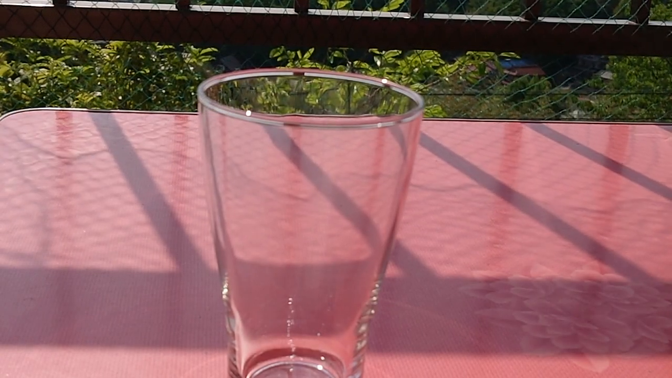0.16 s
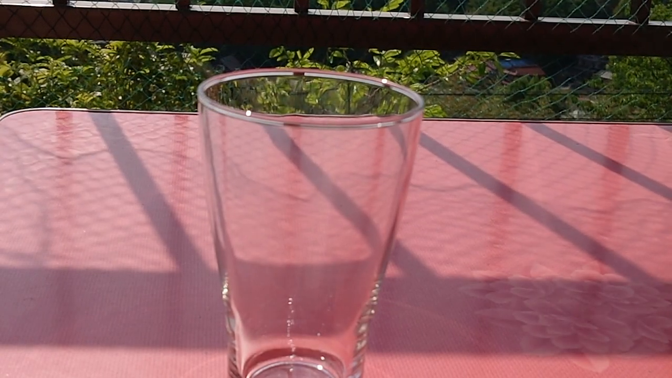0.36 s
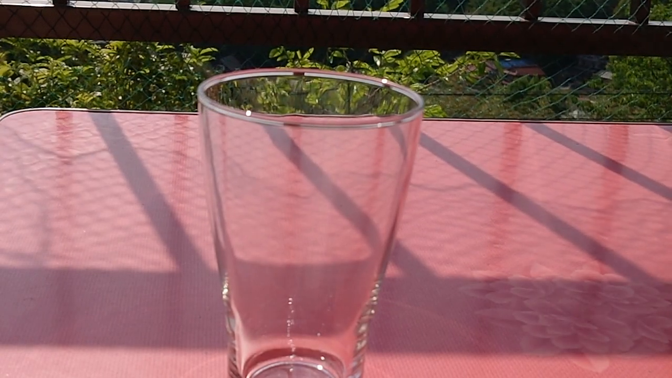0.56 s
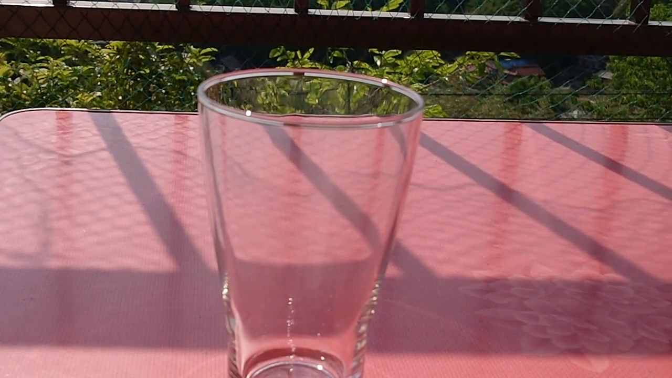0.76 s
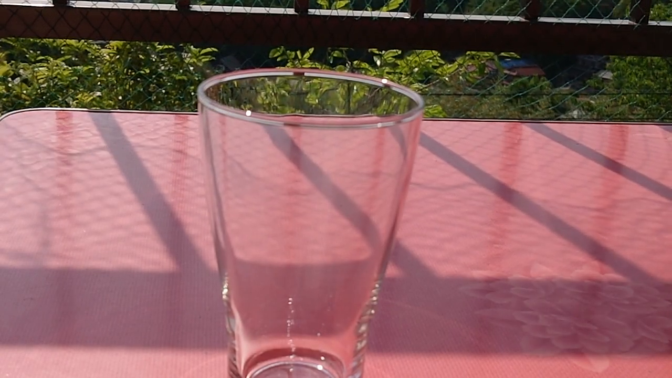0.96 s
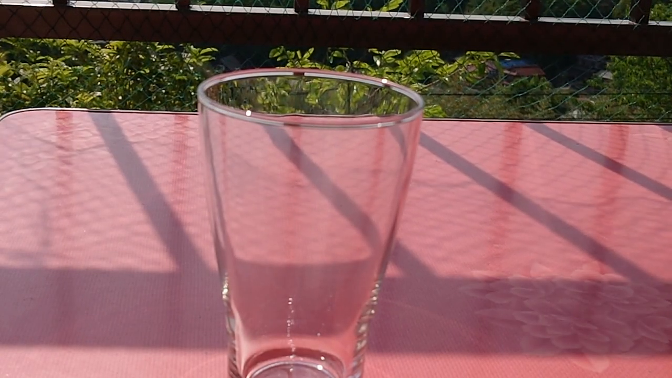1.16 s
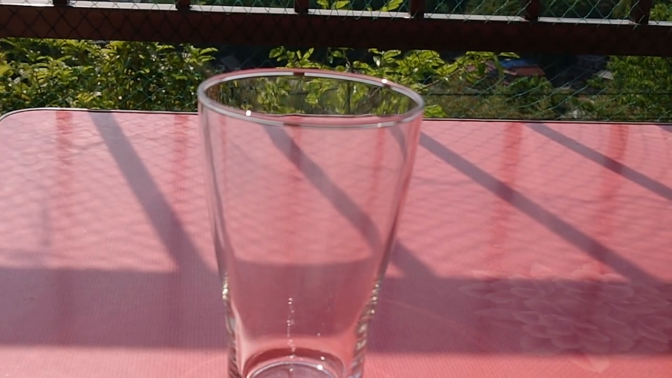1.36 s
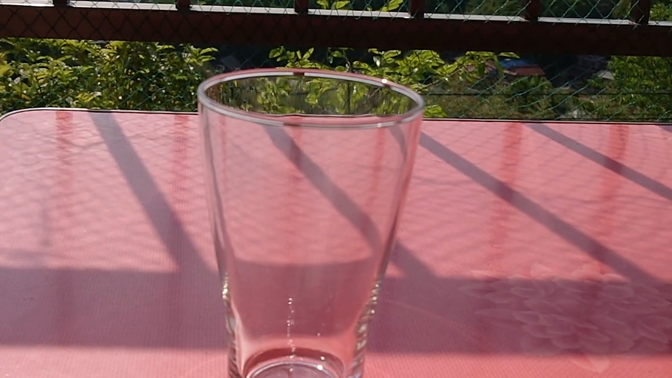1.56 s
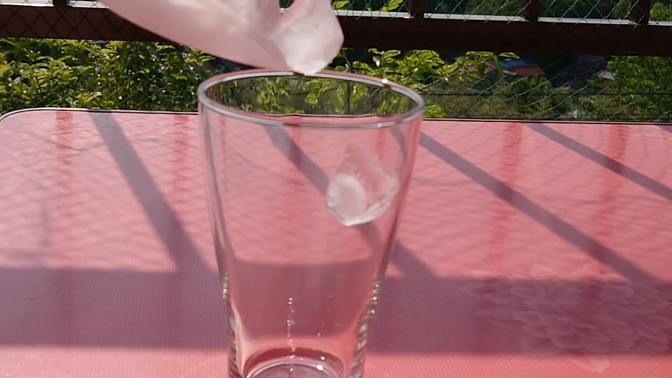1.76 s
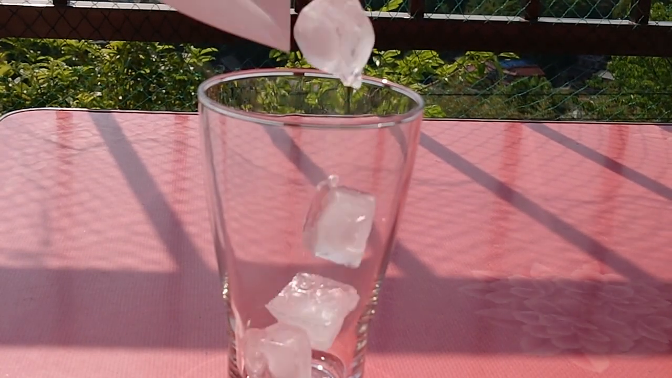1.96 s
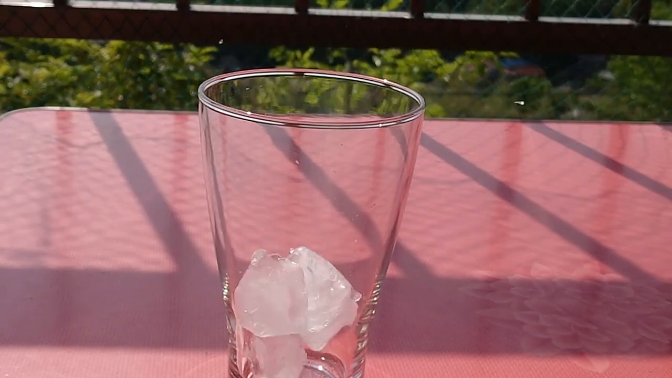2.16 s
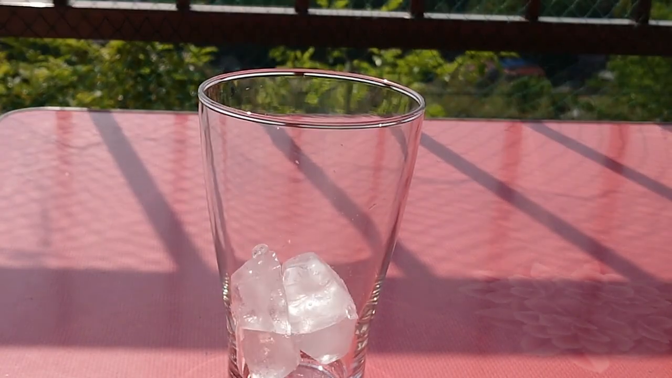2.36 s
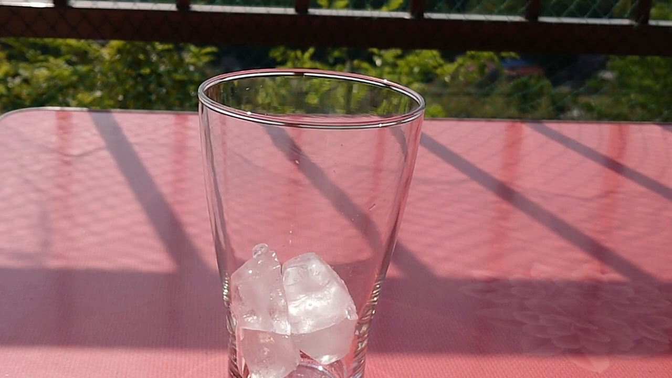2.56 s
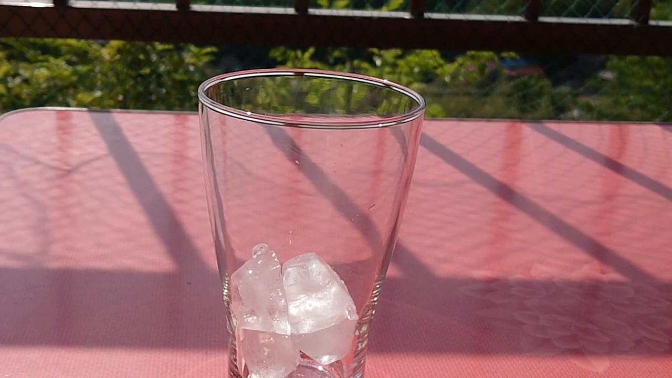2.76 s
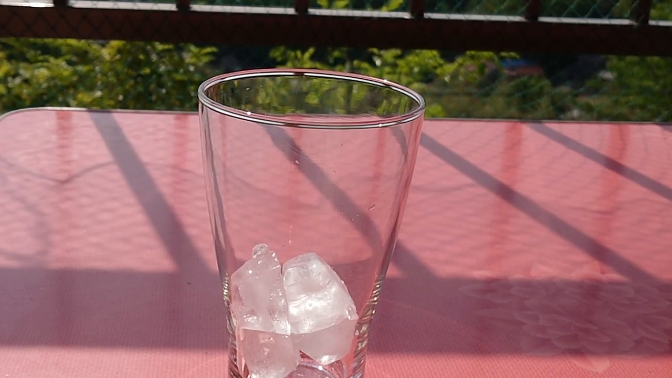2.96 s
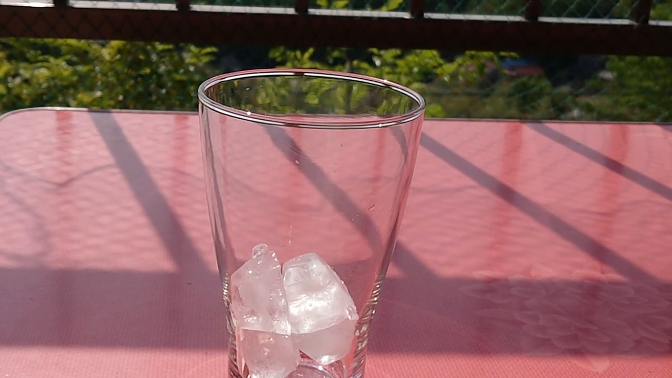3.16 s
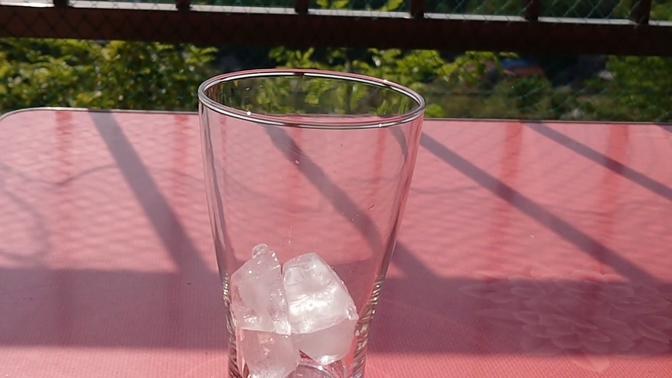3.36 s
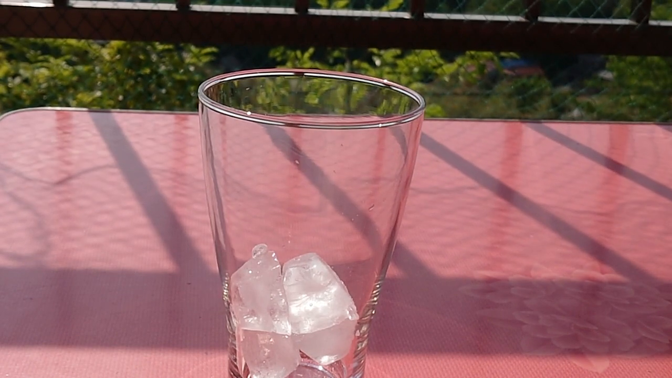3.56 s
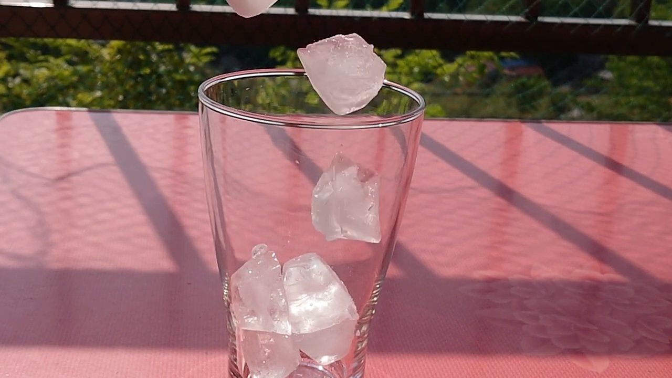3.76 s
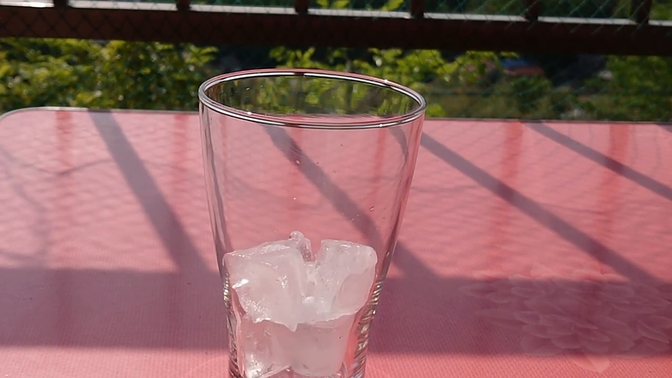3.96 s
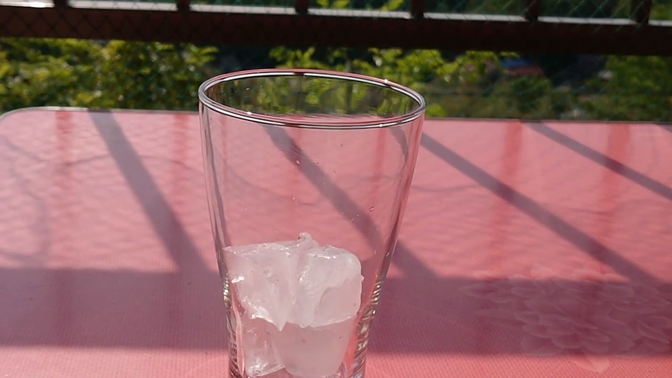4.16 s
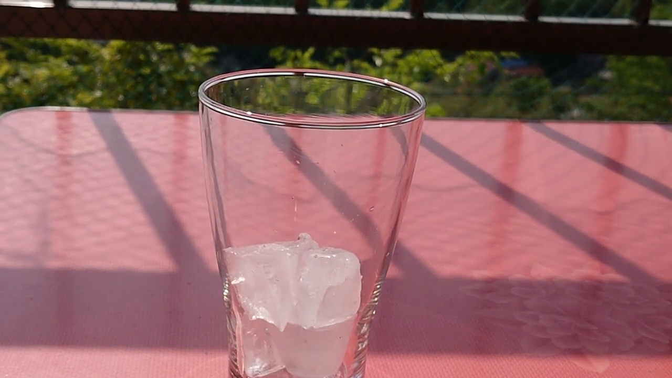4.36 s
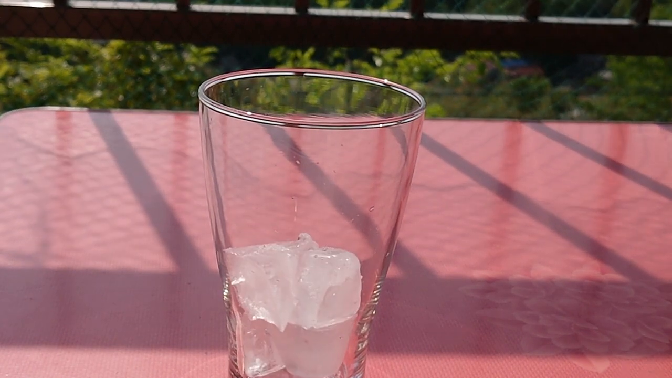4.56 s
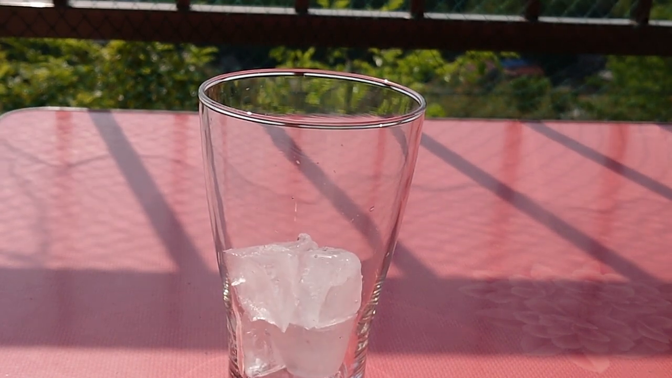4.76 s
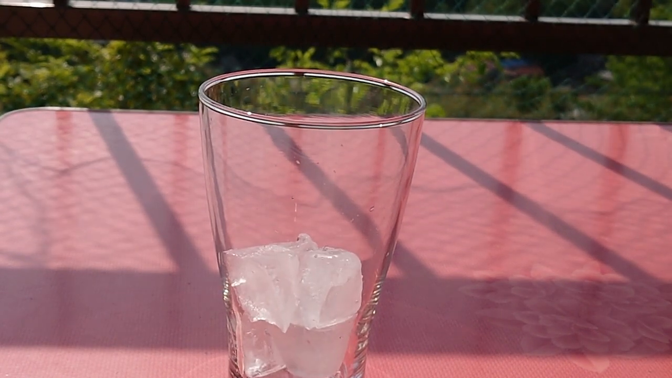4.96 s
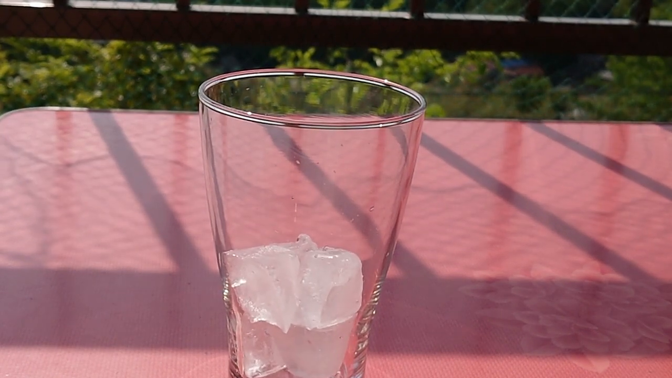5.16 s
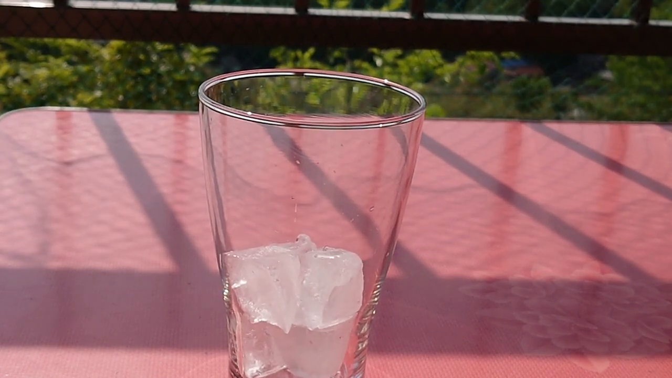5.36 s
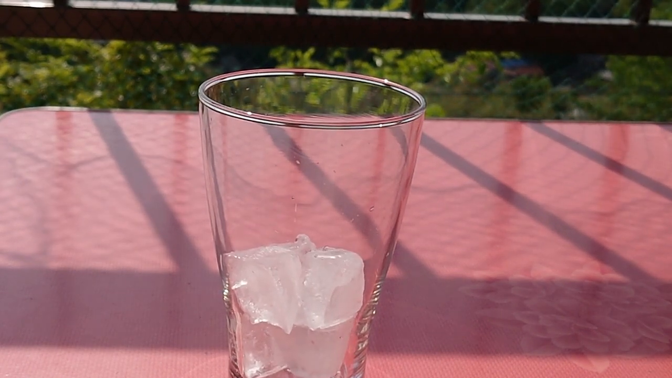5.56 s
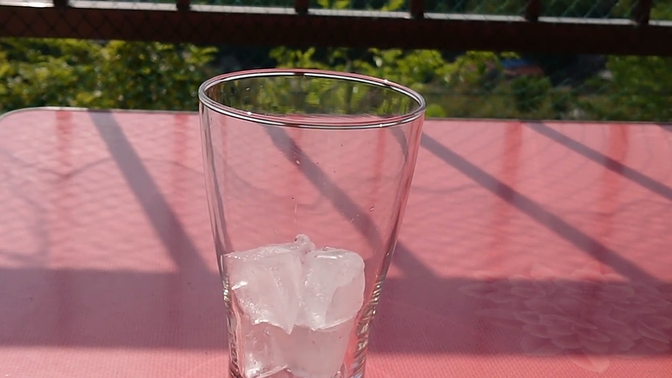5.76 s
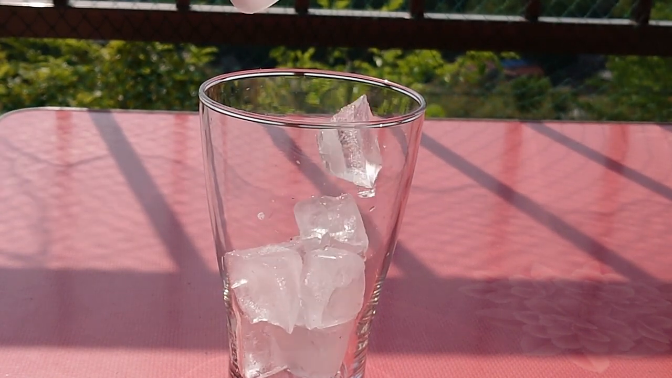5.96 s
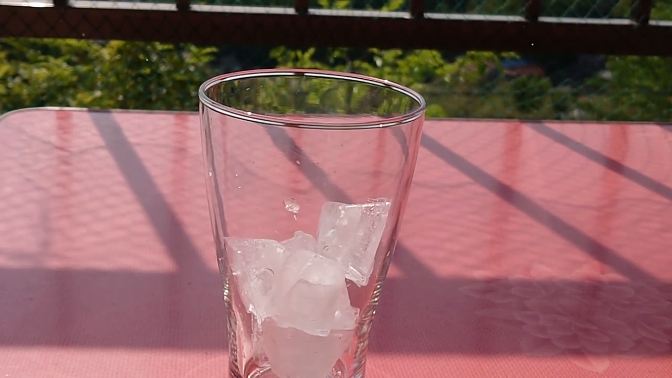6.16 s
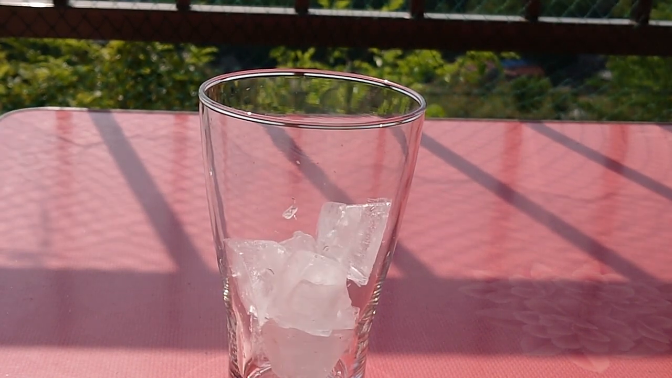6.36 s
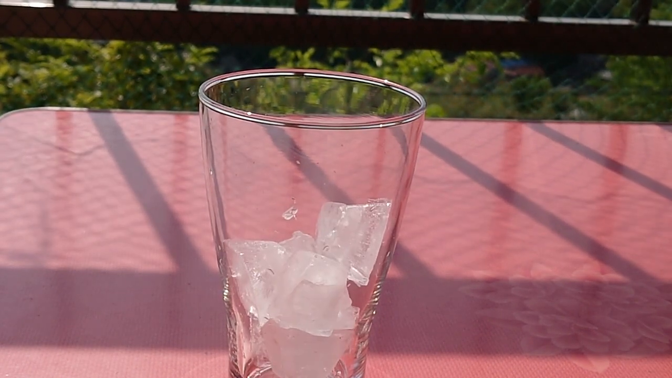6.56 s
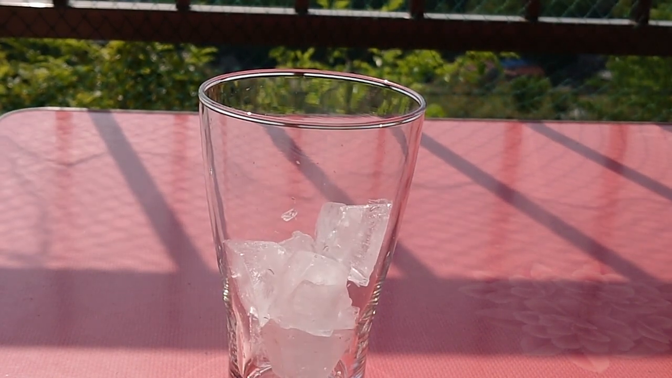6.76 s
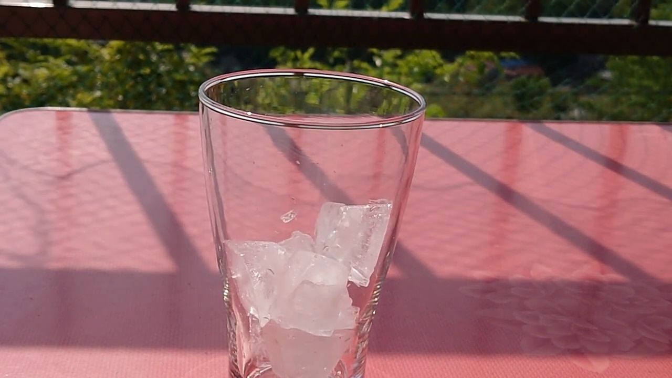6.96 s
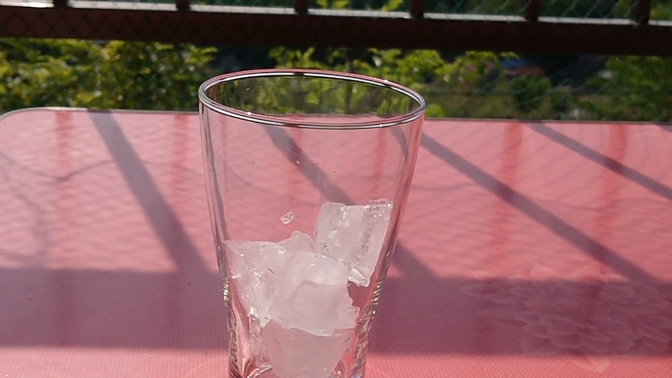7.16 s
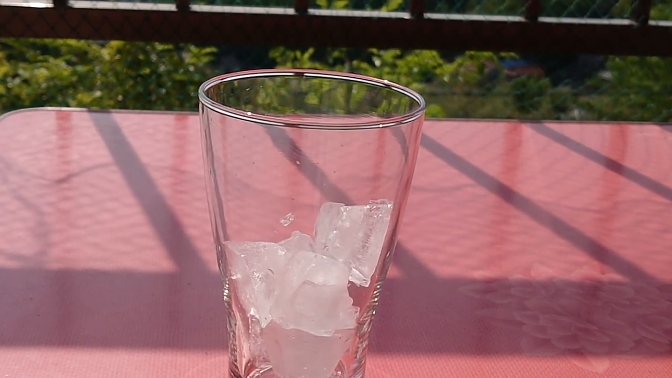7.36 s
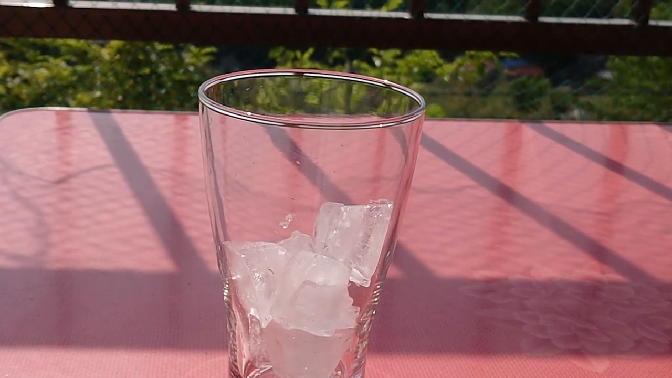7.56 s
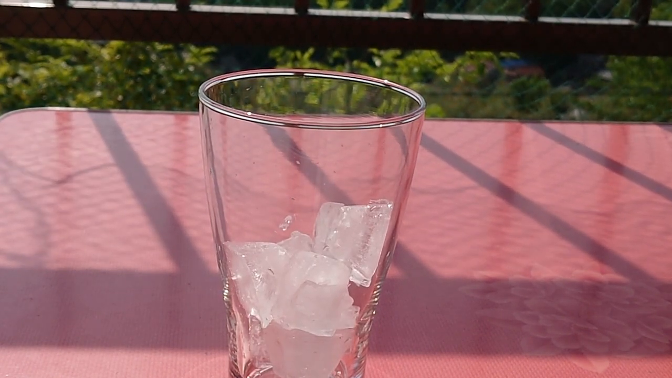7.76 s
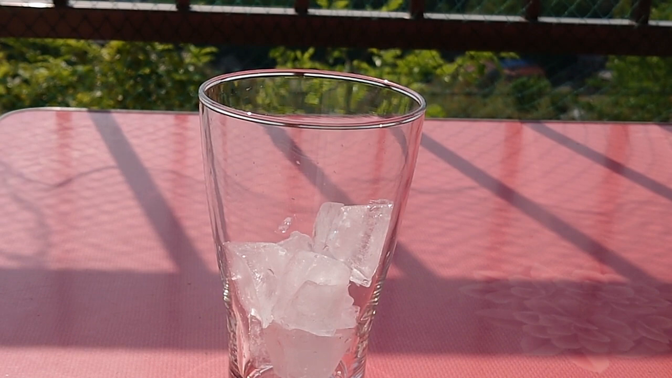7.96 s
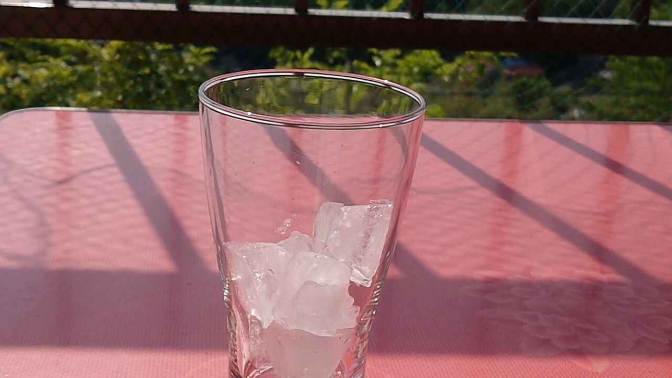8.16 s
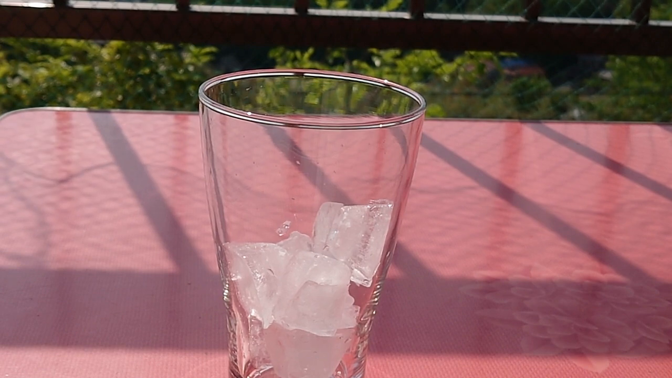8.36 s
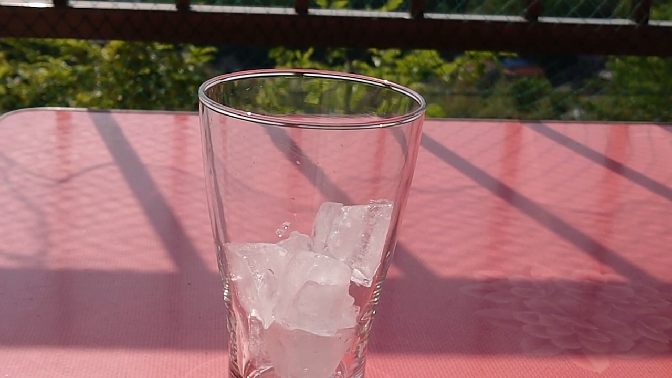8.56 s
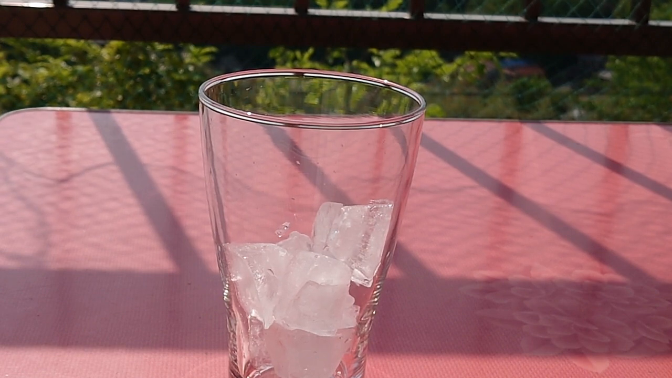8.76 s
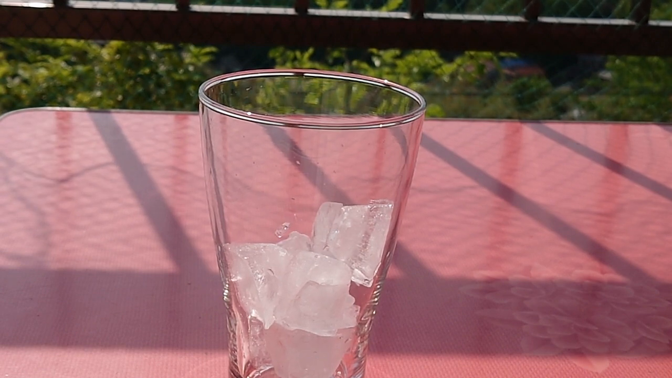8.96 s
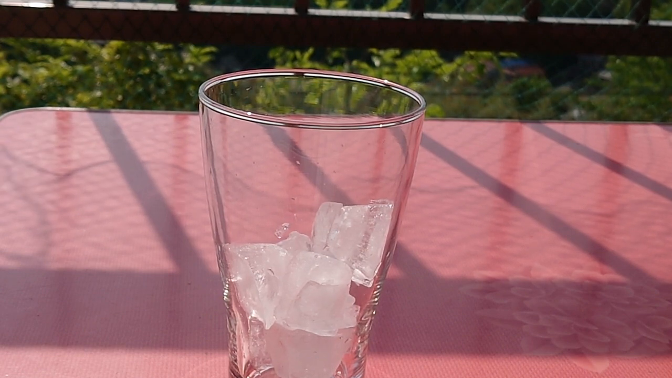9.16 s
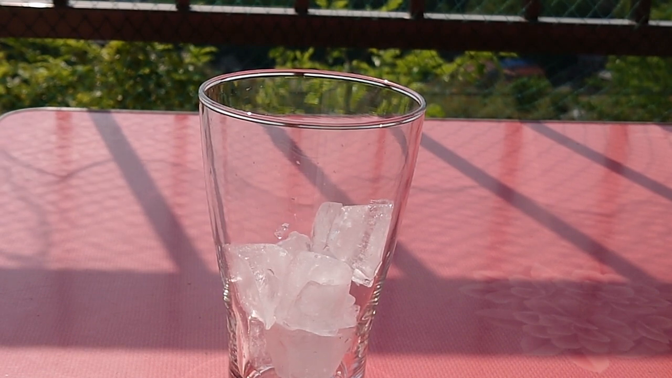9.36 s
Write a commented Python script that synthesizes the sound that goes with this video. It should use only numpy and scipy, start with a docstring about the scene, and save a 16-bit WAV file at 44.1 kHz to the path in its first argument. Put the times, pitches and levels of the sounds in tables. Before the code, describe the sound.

Ice cubes are scooped with a crunchy rattle from a hollow plastic tub and dropped, clinking, into a tall glass three times outdoors.

```python
"""Ice scooped into a glass

Ice is scooped from a plastic tub and dropped, in three goes, into a tall glass on a balcony table.
In the tub, random contacts trigger small pitched ticks of ice and drum on the resonances of the plastic.
In the glass, noise bursts clack and decaying modes ring, the low ones ever shorter as it fills.
At the end the tub thumps down and crinkles. Filtered noise makes a buffeting breeze and faint outdoor hush."""
import sys
import numpy as np
from scipy import signal
from scipy.fft import rfft, irfft
from scipy.io import wavfile
from scipy.ndimage import uniform_filter1d, map_coordinates

SR = 44100
rng = np.random.default_rng(int(sys.argv[2]) if len(sys.argv) > 2 else 0)


def transcribe(signal):
    """Save signal, clipped to [-1, 1], as a 16-bit WAV file at the path in sys.argv[1]."""
    frames = np.atleast_2d(signal).T
    limited = np.clip(frames, -1, 1)
    pcm = np.round(limited * 32767).astype(np.int16)
    wavfile.write(sys.argv[1], SR, pcm)


N = 414540
TIME_S = np.arange(N) / SR

# Distant outdoor noise. Each row: frequency in Hz, relative level in dB.
HUSH_COLOUR = [(18, -42.5), (30, -5), (75, 3), (449, -18), (866, -20.5), (2230, -32), (3870, -30.5),
               (7470, -53), (16000, -61)]
# Gusts at the microphone. Each row: peak in seconds, half length (to 1/e) in seconds, relative level in dB.
GUSTS = [(3.85, 0.24, -49), (5.513, 0.11, -46.5), (5.92, 0.036, -38.5), (6.605, 0.066, -41),
         (6.987, 0.011, -25), (7.262, 0.017, -32), (7.413, 0.074, -22.5), (7.694, 0.55, -46)]
# Pushes of the scoop through the ice. Each row: start in seconds, length in seconds,
# relative crunch level in dB, tub boom in dB above the crunch setting.
SCOOP_PUSHES = [(0, .18, -24, -3.5), (0.242, 0.36, -31.5, -8), (.632, 0.33, -34, -1), (2.694, 0.61, -39, 4),
                (2.847, 0.22, -29.5, -3.5), (3.107, 0.15, -35.5, -13.5), (3.334, 0.23, -55, -8.5),
                (4.435, 0.099, -38.5, -1), (4.599, 0.32, -29, -3), (4.949, 0.47, -32.5, -7.5),
                (5.576, 0.14, -43, 2), (5.835, 0.025, -46, -4), (6.793, 0.25, -49, 2),
                (7.062, 0.09, -46.5, 1.5), (7.2, 0.094, -41.5, -10)]
# Wet cubes sliding off the scoop, louder as they gather speed. Each row: start in seconds,
# length in seconds, relative starting level in dB.
SLIDES = [(1.667, 0.716, -60), (3.877, 0.029, -44)]
# Crack of ice. Each row: frequency in Hz, relative level in dB.
CRACK_COLOUR = [(150, -31.5), (1300, 0), (2400, -2.5), (5400, -12.5), (6600, -22), (7600, -31.5),
                (10000, -23), (13300, -38), (15600, -30)]
# Modes of the tub. Each row: multiple of the main resonance, width in Hz, relative level in dB.
TUB_MODES = [(.27, 223.7, -26), (.62, 139, -7.5), (.9, 107.5, 2.5), (1.04, 125.5, 4.5), (1.85, 220, -5.5)]
# Loudest knocks of cubes on scoop and tub. Each row: time in seconds, relative crack level in dB,
# tub boom in dB above the crack setting.
KNOCKS = [(.030, -17, 1), (.053, -19.5, 3), (.089, -25.5, 14.5), (.122, -22, 8.5), (.136, -15, -5.5),
          (.160, -21, 9.5), (.289, -23, 6.5), (.316, -20.5, 3), (.392, -17, -3.5), (.651, -31.5, 8),
          (.666, -33, 13.5), (.6871, -25.5, 11.5), (.699, -27, 8.5), (.783, -22.5, 14), (.813, -25.5, 14),
          (1.0236, -25, 6.5), (1.1221, -37.5, -6.5), (2.6996, -26.5, 6.5), (2.7465, -22, 5),
          (2.766, -24, 9.5), (2.896, -26, 9), (2.917, -13.5, 8), (2.944, -17, 5), (3.010, -34, 17),
          (3.027, -19.5, 7), (3.051, -24, 8), (4.4398, -20, -7.5), (4.4505, -16.5, -4.5),
          (4.4891, -22.5, 4), (4.6152, -17, -11), (4.6283, -9.5, 3.5), (4.674, -23, 2), (4.757, -18, 6),
          (4.779, -23.5, 8), (4.846, -25, 1), (4.916, -20, -1.5), (5.004, -15.5, -9), (5.163, -25.5, 0),
          (5.212, -26, 6), (5.262, -24.5, 2), (5.317, -25.5, 8.5), (5.592, -21.5, 7), (5.6151, -17.5, 2.5),
          (5.656, -30.5, 5), (5.7597, -20, -4), (6.766, -27.5, 7.5), (6.876, -40.5, 16),
          (6.9378, -20.5, -2.5), (7.074, -38, 1), (7.144, -32.5, 7), (7.283, -32.5, 7)]
# Place of the tub: off to the right, held by the glass, then moved away.
# Each row: time in seconds, delay of the left port in seconds.
TUB_PLACE = [(1.2, 0.00017), (1.7, 0.000016), (6.2, 0.000017), (6.75, 0.00024)]
# One cube grating along its neighbours. Each row: start in seconds, length in seconds,
# relative level in dB, pitch of the cube in Hz.
SCRAPES = [(0.385, 0.032, -29, 4490), (0.538, 0.063, -37, 2500), (0.818, 0.038, -38.5, 3750),
           (2.711, 0.017, -34, 4230), (2.825, 0.017, -29.5, 2320), (3.113, 0.016, -31.5, 2930),
           (3.143, 0.01, -30, 2600), (3.162, .018, -29.5, 2500), (3.441, 0.013, -42.5, 2820),
           (3.703, 0.012, -46.5, 2380), (4.737, .035, -29, 2380), (4.965, 0.017, -27, 1960),
           (5.007, 0.015, -29.5, 2360), (5.126, 0.012, -30.5, 2610), (6.939, 0.021, -30.5, 3440),
           (6.988, 0.02, -36.5, 1710)]
# A loose cube ticking on its neighbour, clear of the tub. Each row: time in seconds,
# relative level in dB, pitch in Hz.
LOOSE_TICKS = [(1.8156, -26, 3150), (3.4186, -27.5, 2120), (3.601, -33, 2310), (5.9685, -38, 1670),
               (6.007, -36, 2270), (6.112, -25, 1890), (6.5147, -49, 2820), (6.57, -44.5, 3190),
               (6.7063, -36, 3680), (6.856, -31, 4170)]
# Cubes striking in the glass. Each row: time in seconds, then relative levels in dB of
# the wall ring, the clack and the thud on the base.
CLINKS = [(1.963, -38.5, -29.5, -62.5), (2.035, -42, -30, -14.5), (2.063, -41.5, -17, -81.5),
          (2.085, -23, -19, -36.5), (2.138, -36, -18.5, -17.5), (2.150, -24, -21.5, -25.5),
          (2.198, -39.5, -25, -24.5), (2.222, -35.5, -17.5, -30), (2.243, -27, -13.5, -30),
          (2.303, -33, -20, -21), (2.383, -41.5, -32.5, -27), (3.987, -38.5, -27.5, -42),
          (3.997, -27.5, -12, -18), (4.006, -21.5, -31, -25.5), (4.022, -21, -18, -35),
          (4.056, -25.5, -19.5, -32.5), (4.104, -41.5, -25.5, -24), (6.16, -45, -30, -45),
          (6.183, -34, -17, -25), (6.207, -40, -17, -24)]
# Clack of a cube on glass. Each row: frequency in Hz, relative level in dB.
CLACK_COLOUR = [(150, -3), (800, 13), (5200, 10), (6100, 3.5), (7700, -31), (9200, -38.5), (10600, -25),
                (14000, -39.5), (15600, -22)]
# Foot of the glass on the table. Each row: frequency in Hz, width in Hz, relative level in dB.
BASE_MODES = [(283, 110, -2), (579, 59, -8.5), (788, 51, -0.5), (1210, 900, 4.5)]
# Main modes of the glass wall. Each row: frequency in Hz, decay time (T60) without ice in seconds.
MAIN_MODES = [(1502, 0.26), (2449, 0.6), (4309, 0.33)]
# Answer of each main mode to a blow. Each row: dB at a medium blow, extra dB per dB of force,
# extra dB per scoop of ice. Hard blows and a fuller glass favour the highest mode.
WALL_ANSWER = [(-0.5, .05, 1.2), (1, -0.12, 0.16), (-1.5, 0.52, 2.2)]
# Dips and swells of the highest main mode. Each row: middle in seconds, half length (to 1/e)
# in seconds, peak change in dB.
RING_DIPS = [(2.193, 0.046, -12), (4.12, 0.029, -16), (4.19, .07, 4), (6.255, 0.014, -14), (6.305, .07, 6)]
# Weaker modes of the glass, which follow the clack. Each row: frequency in Hz, relative level in dB.
SHIMMER_MODES = [(694, -27), (5920, -18), (5870, -17), (5992, -17), (6760, -25), (6992, -26), (8436, -30),
                 (9722, -31), (10815, -34), (11480, -36), (13221, -41), (15320, -37)]
# The tub bumps on the table and at last is set down, rocking on its rim.
# Each row: time in seconds, relative level in dB.
THUMPS = [(2.918, -20.5), (4.63, -35), (8.358, -15), (8.367, -19), (8.388, -18.5), (8.42, -28.5)]
# Thump of the tub. Each row: frequency in Hz, relative level in dB.
THUMP_COLOUR = [(40, -3.5), (300, 0.5), (450, -8), (1400, -16), (3000, -32), (8000, -60)]
# Plastic crinkling as the hand lets go. Each row: time in seconds, relative level of the snap in dB.
CRINKLES = [(8.357, -43), (8.408, -34), (8.616, -49), (8.774, -36), (8.876, -34.5), (8.8985, -32.5),
            (8.94, -36), (9.068, -43), (9.127, -44.5)]
# Snap of thin plastic. Each row: frequency in Hz, relative level in dB.
PLASTIC_COLOUR = [(150, 1), (1600, 3), (5400, -7.5), (7400, -36), (9500, -21), (15000, -38)]
# Echoes of the balcony. Each row: frequency in Hz, decay time (T60) in seconds.
BALCONY_DECAY = [(200, 0.5), (900, 0.22), (5000, 0.16)]

HUSH_DB, CALM_BREEZE_DB = -53.5, -72.5
# A hand movement bites, eases as the load gives way, and dies out when it stops.
BITE_S, EASE_DB_PER_S, SETTLE_DB_PER_S, SLIDE_SWELL_DB_PER_S = 0.012, 17.5, 253.5, 19
CUBES_PER_S = 45  # how often the scoop meets other cubes
TUB_HZ = 792  # main resonance
LEFT_SHADE = 0.083  # share of three-sample averaging at the left port
# A loose cube is so damped that its pitch is only a broad bump in the crack.
TICK_OCTAVES, TICK_BUMP_DB = 0.11, 12.5
MEDIUM_BLOW_DB = -29
ICE_DAMPING_DB_PER_S = 115  # added to the low modes by the first scoop; later ones add less
CONTACT_HZ = 1800  # width over which a contact spreads each mode's onset
SHIMMER_T60_S = 0.15  # without ice
GRIND_DB, GRIND_T60_S = -22, 0.096
CREASE_HZ, RUN_S, RUN_DB = 5520, 0.023, -11.5  # nominal ring of a crease; push of its run of snaps
EDGE_HZ = 16000


def amp(db):
    """Decibels to gain."""
    return 10 ** (np.asarray(db) / 20)


def evened(x):
    """Scales to rms 1."""
    return x / np.sqrt(np.mean(x ** 2) + 1e-20)


def read(points, hz):
    """Reads a table on a log-frequency axis."""
    f, value = np.transpose(points)
    return np.interp(np.log(hz + 1), np.log(f + 1), value)


def add(mix, s, sound):
    """Adds a sound to the mix at time s."""
    part = mix[..., max(round(s * SR), 0):][..., :sound.shape[-1]]
    part += sound[..., :part.shape[-1]]


def pair(shape, likeness):
    """Left and right noise that are partly alike."""
    shared, own = rng.standard_normal(shape), rng.standard_normal((2, shape))
    return np.sqrt(likeness) * shared + np.sqrt(1 - likeness) * own


def wander(hz):
    """Slow chance of rms 1 that changes up to hz times a second."""
    low_pass = signal.butter(2, hz, fs=SR, output="sos")
    return evened(signal.sosfilt(low_pass, rng.standard_normal(N)))


def gesture(start, length, db, slope_db_per_s):
    """Gain of one movement of the hand: attack, sloping hold, release."""
    t = np.clip(TIME_S - start, 0, length + 1)
    held = np.minimum(t, length)
    return np.minimum(t / BITE_S, 1) * amp(db + slope_db_per_s * held - SETTLE_DB_PER_S * (t - held))


def swell(middle, half, db):
    """Gain of a smooth rise and fall."""
    return amp(db) * np.exp(-np.minimum(((TIME_S - middle) / half) ** 2, 50))


def together(gains):
    """Gain of several overlapping movements: their powers add."""
    return np.sqrt(sum(gain ** 2 for gain in gains))


def click(points, size=1024):
    """The shortest causal click with a given colour (minimum phase)."""
    log_gain = np.log(amp(read(points, abs(np.fft.fftfreq(size, 1 / SR)))))
    return np.fft.ifft(np.exp(np.conj(signal.hilbert(log_gain)))).real[:size // 2]


def burst(colour, t60, likeness, size=2048):
    """One contact: a quickly dying stereo scatter of clicks, with mean energy 1 per port."""
    scatter = pair(size, likeness) * amp(-60 * np.arange(size) / SR / t60)
    coloured = signal.fftconvolve(scatter, colour[None], axes=1)[:, :size]
    return evened(coloured) / np.sqrt(size)


def resonate(x, hz, width):
    """A mode, fixed or moving, that rings with height 1 after a unit click."""
    turn = np.exp(2j * np.pi * np.cumsum(hz * np.ones(N)) / SR)
    envelope = signal.lfilter([1], [1, -np.exp(-np.pi * width / SR)], x / turn + 1e-18)
    return (turn * envelope).imag


def contacts(per_s, spread_db, size=2400):
    """Random contacts of uneven force, their power evened over size samples (some 50 ms)."""
    force = amp(spread_db * np.minimum(rng.exponential(1, N), 4)) * rng.choice([-1, 1], N)
    train = force * (rng.random(N) < per_s / SR)
    return train / np.sqrt(abs(uniform_filter1d(train ** 2, size)) + 0.092 * np.mean(train ** 2))


def cube_colour(hz, bump_db, octaves):
    """The crack of ice, with a bump at the pitch of one cube."""
    f = np.geomspace(100, SR / 2, num=200)
    bump = bump_db / (1 + (np.log2(f / hz) / octaves) ** 2)
    return click(np.transpose([f, read(CRACK_COLOUR, f) + bump]))


def ice_tick(colour, hz, crack_t60, ring_t60, ring_db):
    """A crack of ice with a brief ring; it reaches the two ports quite differently."""
    crack = burst(colour, crack_t60, likeness=0.3)
    t = np.arange(crack.shape[1]) / SR
    ring = np.sin(2 * np.pi * hz * t + rng.standard_normal((2, 1))) * amp(-60 * t / ring_t60)
    ring = amp(ring_db) * evened(ring) / np.sqrt(len(t))
    return (crack + ring) / np.hypot(1, amp(ring_db))


def hush():
    """Distant town and leaves: coloured noise, gently swelling."""
    air = pair(N, likeness=0.55)
    noise = irfft(rfft(air) * amp(read(HUSH_COLOUR, np.fft.rfftfreq(N, 1 / SR))), N)
    return amp(HUSH_DB + 1.7 * wander(4.6)) * evened(noise)


def breeze():
    """Lumpy low buffeting, stronger on the left; hard gusts reach slightly higher in pitch."""
    level = together([amp(CALM_BREEZE_DB)] + [swell(*row) for row in GUSTS])
    lumps = amp(3.5 * wander(14) - 1)
    low_band = signal.butter(4, [46, 100], "band", fs=SR, output="sos")
    high_band = signal.butter(3, [90, 280], "band", fs=SR, output="sos")
    low = evened(signal.sosfilt(low_band, pair(N, likeness=0.5)))
    high = evened(signal.sosfilt(high_band, pair(N, likeness=0.76)))
    high = amp(-12) * high * (level / level.max()) ** 0.051
    return level * lumps * (low + high) * amp([[3], [-4.5]])


def crunch(count=48):
    """Cubes pushed over one another: clumps of ticks from two cubes at a time, each with its pitch."""
    pushing = together(gesture(s, length, db, -EASE_DB_PER_S) for s, length, db, _ in SCOOP_PUSHES)
    sliding = together(gesture(*row, SLIDE_SWELL_DB_PER_S) for row in SLIDES)
    clumps = amp(2 * wander(30) - 1)
    train = contacts(per_s=850, spread_db=5, size=2000) * (pushing + sliding) * clumps
    meeting = np.cumsum(rng.random(N) < CUBES_PER_S / SR)
    cube = rng.integers(0, count, N)[meeting + rng.integers(0, 2, N)]
    ticks = []
    for hz in np.geomspace(1150, 5000, count):
        colour = cube_colour(hz, bump_db=5.5, octaves=0.26)
        ring_db = -2 - 4 * np.log2(hz / 1500)
        ticks.append(ice_tick(colour, hz, crack_t60=0.019, ring_t60=0.014, ring_db=ring_db))
    out = np.zeros((2, N))
    for at in np.flatnonzero(abs(train) > amp(-100)):
        add(out, at / SR, train[at] * ticks[cube[at]])
    return amp(0.5) * out


def tub():
    """Pushes and knocks drum on hollow plastic modes of wandering pitch, a little to the right."""
    pushing = together(gesture(s, length, db + boom_db, -EASE_DB_PER_S)
                       for s, length, db, boom_db in SCOOP_PUSHES)
    drive = amp(-15) * contacts(per_s=500, spread_db=3) * pushing
    for s, db, boom_db in KNOCKS:
        add(drive, s, amp([db + boom_db - 1]))
    pitch_hz = TUB_HZ * np.exp(0.083 * wander(17))
    boom = sum((-1) ** k * amp(db) * resonate(drive, multiple * pitch_hz, width)
               for k, (multiple, width, db) in enumerate(TUB_MODES))
    return boom * amp([[-1.7], [1.5]])


def knocks():
    """Harder single blows ring one cube, which chatters in a few quick rebounds."""
    out = np.zeros((2, N))
    for s, db, _ in KNOCKS:
        hz = rng.uniform(1400, 3200)
        tick = ice_tick(click(CRACK_COLOUR), hz, crack_t60=0.022, ring_t60=0.034, ring_db=-8)
        add(out, s, amp(db + 18.5) * tick)
        for delay in rng.uniform(0.0011, 0.008, size=3):
            add(out, s + delay, amp(db + 9.5) * tick)
    return out


def scrapes():
    """A quick run of slips keeps exciting the same cube, so each scrape has its own colour."""
    out = np.zeros((2, N))
    for s, length, db, hz in SCRAPES:
        t = TIME_S[TIME_S < length + 0.004]
        slips = evened(rng.standard_normal(len(t)) * (rng.random(len(t)) < 1200 / SR))
        colour = cube_colour(hz, TICK_BUMP_DB, TICK_OCTAVES)
        tick = ice_tick(colour, hz, crack_t60=0.018, ring_t60=0.022, ring_db=-6)
        add(out, s, amp(db) * signal.fftconvolve(slips[None], tick, axes=1))
    return out


def loose_ticks():
    """A click and a short scatter, each coloured by the pitch of its cube."""
    out = np.zeros((2, N))
    for s, db, hz in LOOSE_TICKS:
        snap = cube_colour(hz, TICK_BUMP_DB, TICK_OCTAVES)
        add(out, s, amp(db + 9) * snap / np.linalg.norm(snap))
        add(out, s, amp(db + 15) * burst(snap, t60=0.028, likeness=0.36))
    return out


def fill_at(s):
    """How many scoops of ice already lie in the glass."""
    return np.interp(s, [2.5, 3.9, 6.1], [0, 1, 2])


def glass_blows(count=10):
    """Cubes clack, rebound and thud through the base; on other ice, more crunch than clack."""
    colour, out, drive = click(CLACK_COLOUR), np.zeros((2, N)), np.zeros(N)
    for s, _, clack_db, thud_db in CLINKS:
        cushion_db = 2.5 * fill_at(s)
        add(out, s, amp(clack_db + 13 - cushion_db) * burst(colour, t60=0.027, likeness=0.23))
        for delay in rng.uniform(0.0044, 0.038, count):
            rebound_db = clack_db - 0.5 + cushion_db - 200 * delay
            add(out, s + delay, amp(rebound_db) * burst(colour, t60=0.012, likeness=0.31))
        add(drive, s, amp([thud_db + 0.5]))
    thuds = sum((-1) ** k * amp(db) * resonate(drive, hz, width)
                for k, (hz, width, db) in enumerate(BASE_MODES))
    return out + thuds


def wall_mode(hz, t60, kicks_db, detune):
    """Each strike adds energy to one mode of the wall; ice resting on it damps the low modes."""
    s, out, swing = np.transpose(CLINKS)[0], np.zeros(N, complex), 0j
    ice_db_per_s = ICE_DAMPING_DB_PER_S * np.sqrt(fill_at(s)) / (1 + (hz / 3100) ** 8)
    falls_db_per_s = 60 / t60 + ice_db_per_s
    for at, length, kick, fall in zip(s, np.diff(s, append=N / SR), amp(kicks_db), falls_db_per_s):
        t = np.arange(max(round(min(length, 1) * SR), 1)) / SR
        swing += kick * np.exp(1j * np.angle(swing)) * rng.choice([-1j, 1j])
        bent_hz = hz * (1 + detune * rng.standard_normal())
        ring = swing * amp(-fall * t) * np.exp(2j * np.pi * bent_hz * t)
        add(out, at, ring)
        swing = ring[-1] * np.exp(2j * np.pi * hz / SR)
    soft = np.exp(-np.pi * CONTACT_HZ / SR)
    out = signal.lfilter([1 - soft], [1, -soft * np.exp(2j * np.pi * hz / SR)], out + 1e-18)
    lag_rad = min(hz / 3700, 1.4)  # between the two microphone ports
    return (out * np.exp(0.5j * lag_rad * np.array([[1], [-1]]))).real


def glass_ring():
    """Three main modes under a high shimmer, which the sliding ice bends, breaks up and smothers."""
    s, ring_db, clack_db, _ = np.transpose(CLINKS)
    main = []
    for (hz, t60), (db, hard, full) in zip(MAIN_MODES, WALL_ANSWER):
        kicks_db = ring_db + db + hard * (ring_db - MEDIUM_BLOW_DB) + full * fill_at(s)
        main.append(wall_mode(hz, t60, kicks_db, detune=0.00035))
    low, middle, high = main
    dips_db = sum(db * swell(at, half, 0) for at, half, db in RING_DIPS)
    out = low + middle + high * amp(dips_db)
    # soft touches barely reach the high modes
    shimmer_db = clack_db + 0.5 - fill_at(s) ** 2 + np.minimum(clack_db - MEDIUM_BLOW_DB, 0)
    for hz, db in SHIMMER_MODES:
        chatter = amp(4.5 * wander(60) - 2)
        kicks_db = shimmer_db + db + rng.normal(-1, 6, len(s))
        out = out + chatter * wall_mode(hz, SHIMMER_T60_S, kicks_db, detune=0.007)
    return out


def glass_grind():
    """After each clack the cube grinds along the wall: tiny contacts splash damped high modes."""
    pressure = np.zeros(N)
    for s, _, clack_db, _ in CLINKS:
        add(pressure, s, amp(clack_db - fill_at(s) - 60 * TIME_S[:SR] / GRIND_T60_S))
    drive = amp(GRIND_DB) * pressure * contacts(per_s=210, spread_db=-0.5)
    ports = [sum(amp(db) * resonate(drive * rng.standard_normal(N), hz, width=0.014 * hz)
                 for hz, db in SHIMMER_MODES[1:]) for _ in range(2)]
    return np.array(ports)


def thumps():
    """The tub lands with a few dull bumps, nearly alike at both ports."""
    colour, out = click(THUMP_COLOUR), np.zeros((2, N))
    for s, db in THUMPS:
        add(out, s, amp(db + 19.5) * burst(colour, t60=0.041, likeness=0.99))
    return out


def crinkle():
    """Thin plastic gives way with a bright ringing snap and a run of tinier ones."""
    colour, out = click(PLASTIC_COLOUR), np.zeros((2, N))
    for s, db in CRINKLES:
        hz = CREASE_HZ * rng.uniform(0.93, 1.1)
        tick = ice_tick(colour, hz, crack_t60=0.018, ring_t60=0.0088, ring_db=-11.5)
        run = contacts(per_s=1300, spread_db=3.5) * gesture(s, RUN_S, db + RUN_DB, -EASE_DB_PER_S)
        add(run, s, amp([db + 18.5]))
        out += amp(4) * signal.oaconvolve(run[None], tick, axes=1)[:, :N]
    return out


def at_tub(x):
    """Sound from the right reaches the left port later and a little duller."""
    late = np.interp(TIME_S, *np.transpose(TUB_PLACE)) * SR  # samples
    left = map_coordinates(x[0], [np.arange(N) - late], order=3)
    left = (1 - LEFT_SHADE) * left + LEFT_SHADE * uniform_filter1d(left, 3)
    return np.array([left, x[1]])


def balcony(x, size=16384):
    """Dense echoes from table, floor and wall, each band dying at its own speed."""
    sparse = rng.random((2, size)) < 0.1
    taps = rng.standard_normal((2, size)) * sparse * (np.arange(size) > 0.003 * SR)
    hz, t, z = signal.stft(taps, SR, nperseg=256)
    decay = amp(-60 * t / read(BALCONY_DECAY, hz)[:, None])
    tail = signal.istft(z * decay, SR, nperseg=256)[1]
    tail = tail / np.linalg.norm(tail, axis=1, keepdims=True)
    return signal.oaconvolve(x, tail, axes=1)[:, :N]


def scene():
    """The glass stands close; the tub is farther off, and each layer has its own share of echo."""
    ice = at_tub(crunch() + knocks() + scrapes() + loose_ticks() + crinkle())
    hollow = at_tub(tub() + thumps())
    blows = glass_blows()
    ring = glass_ring() + glass_grind()
    echoes = balcony(amp(-4.5) * ice + amp(-8) * hollow + amp(-21) * ring + amp(-4) * blows)
    return ice + hollow + ring + blows + echoes + breeze() + hush()


def record(dry):
    """The recorder's treble dip, bass cut and band limit."""
    dipped = signal.lfilter(*signal.iirnotch(7750, 9, fs=SR), dry)
    thin = signal.sosfilt(signal.butter(3, 40, "high", fs=SR, output="sos"), dipped)
    band_limit = signal.firwin(511, EDGE_HZ, window=("kaiser", 9), fs=SR)
    return signal.oaconvolve(thin, band_limit[None], "same")


dry = scene()
out = record(dry)
transcribe(out)
```